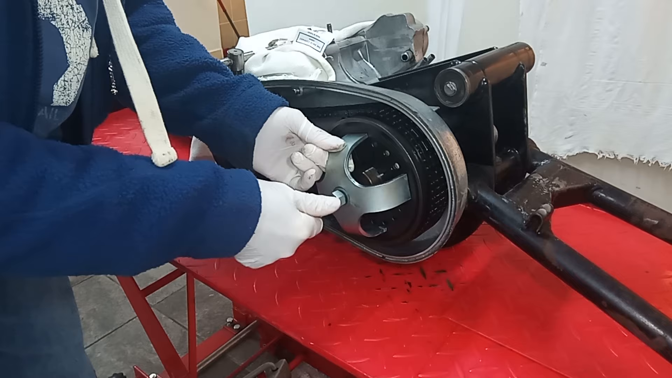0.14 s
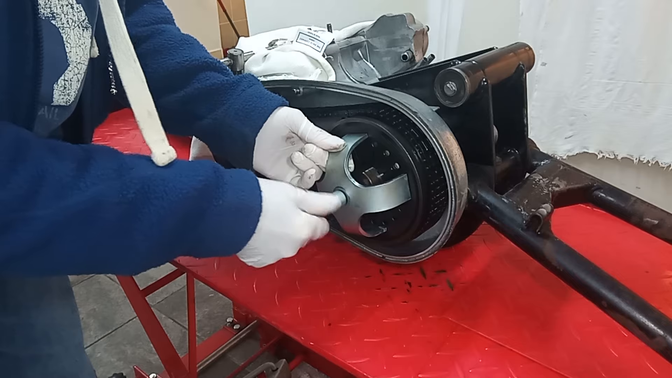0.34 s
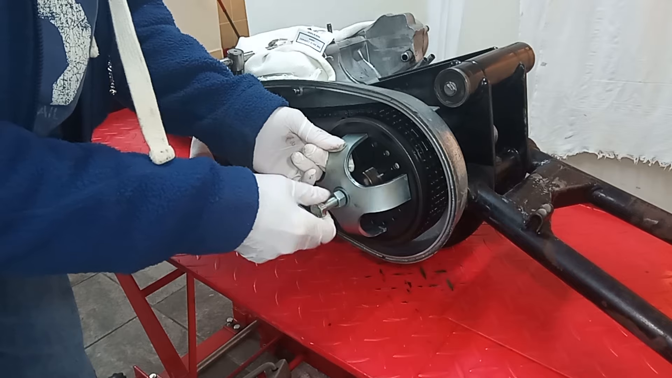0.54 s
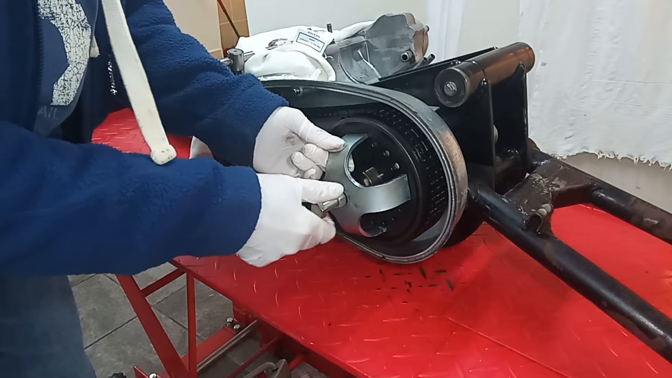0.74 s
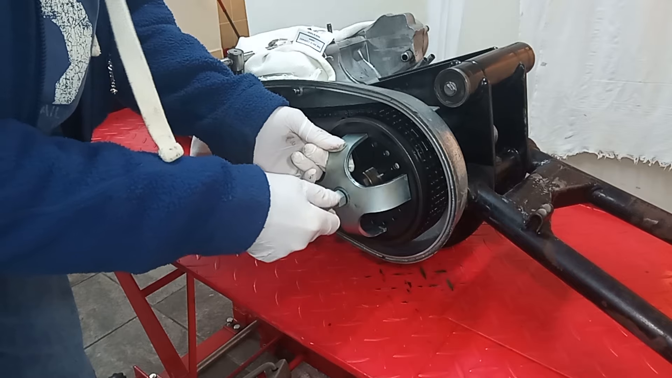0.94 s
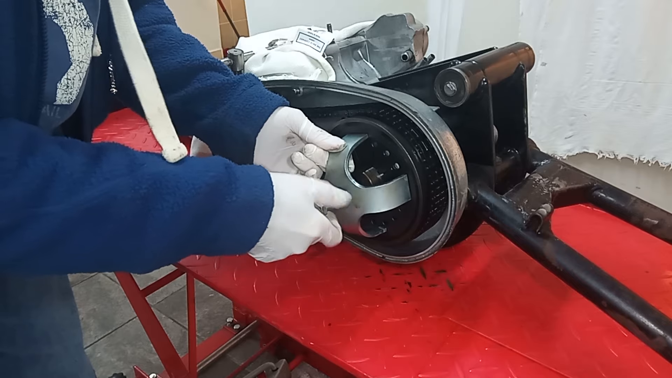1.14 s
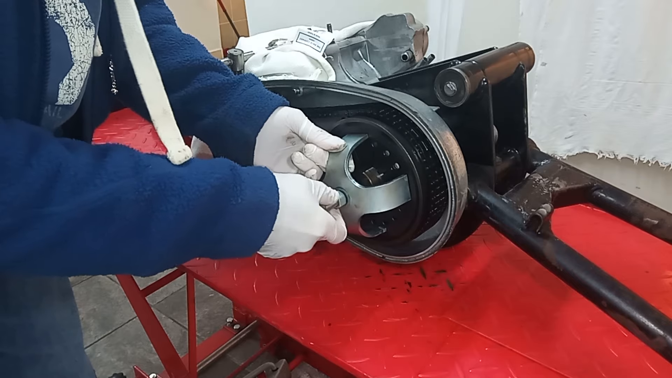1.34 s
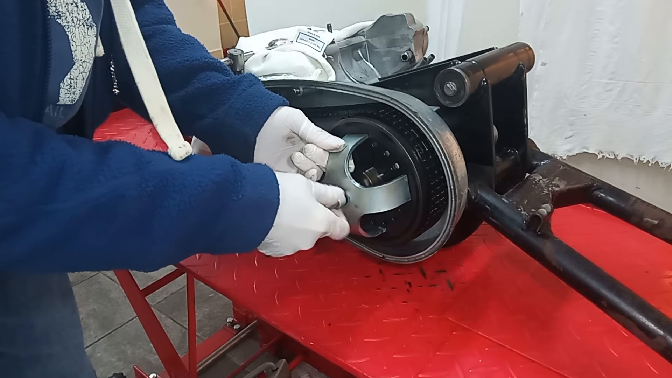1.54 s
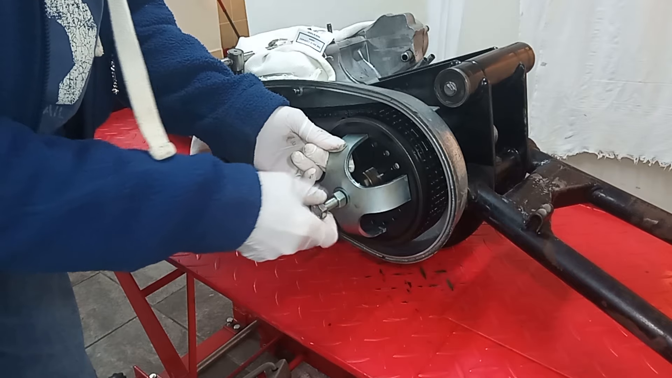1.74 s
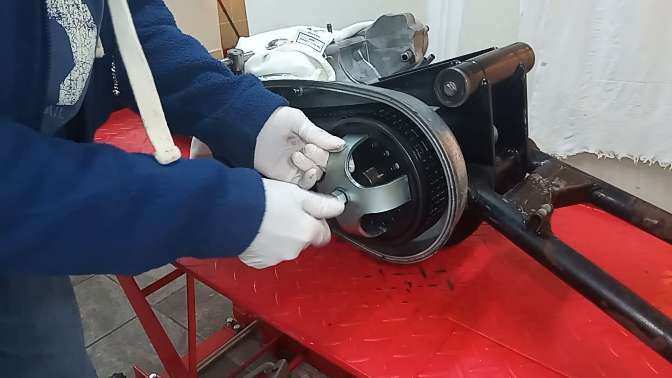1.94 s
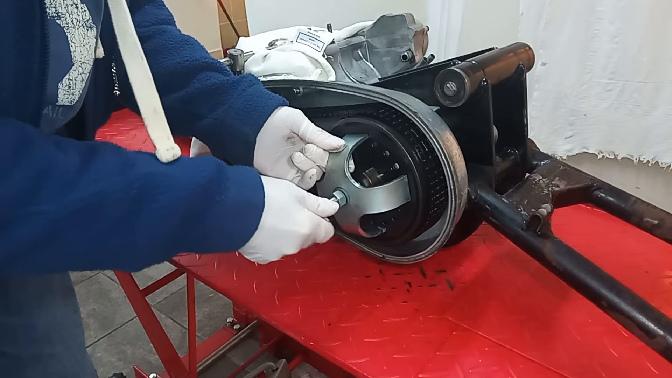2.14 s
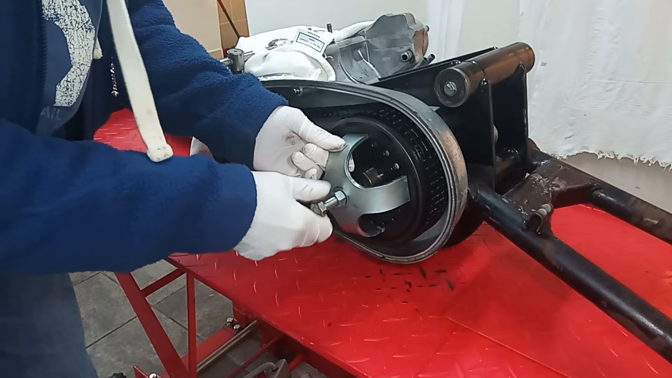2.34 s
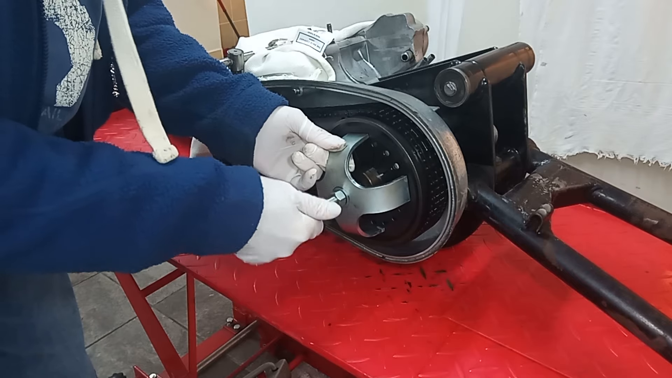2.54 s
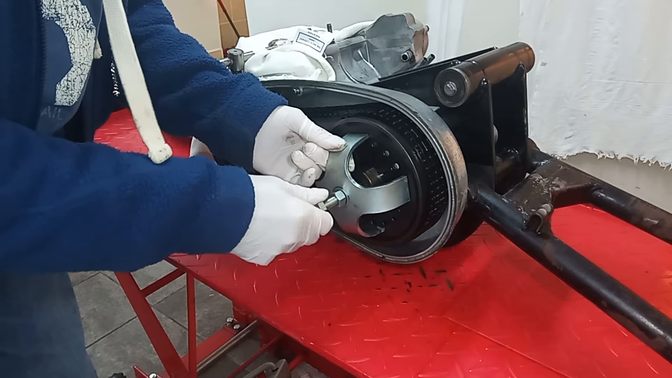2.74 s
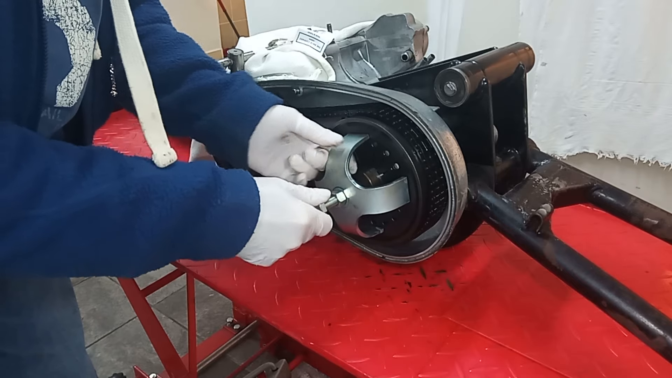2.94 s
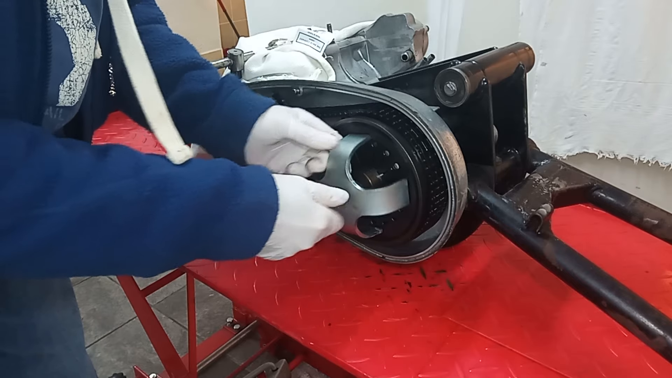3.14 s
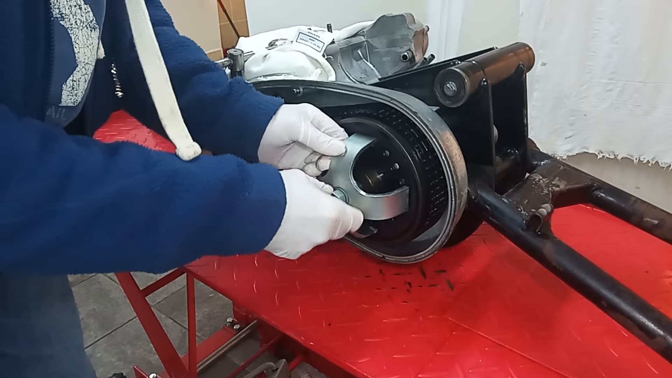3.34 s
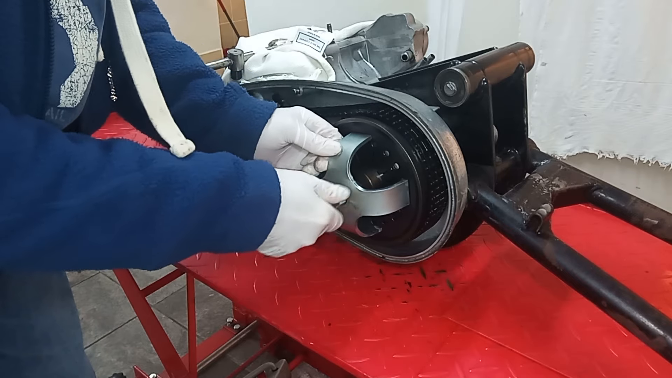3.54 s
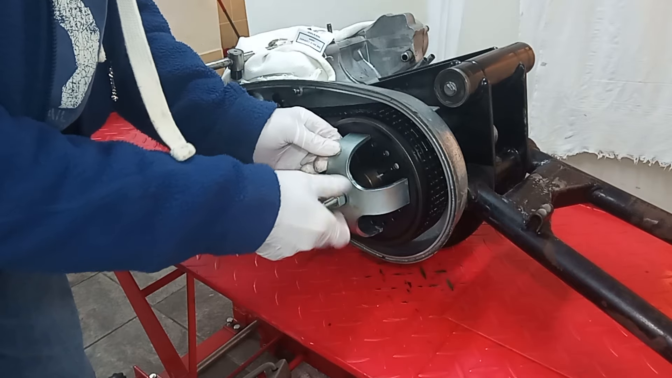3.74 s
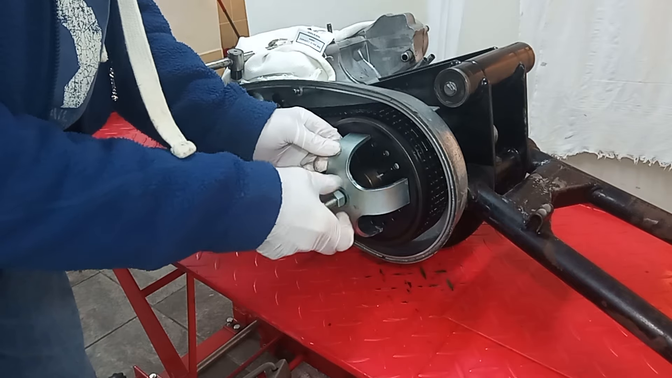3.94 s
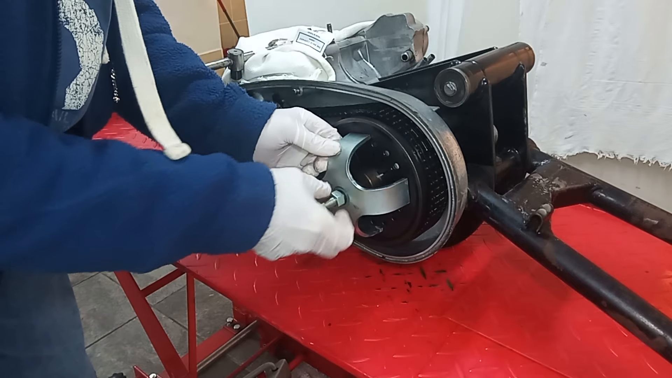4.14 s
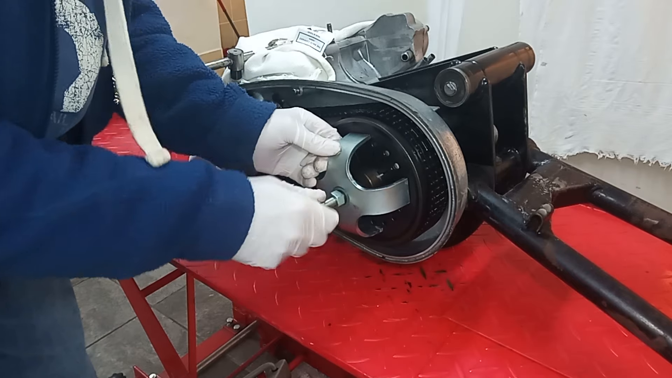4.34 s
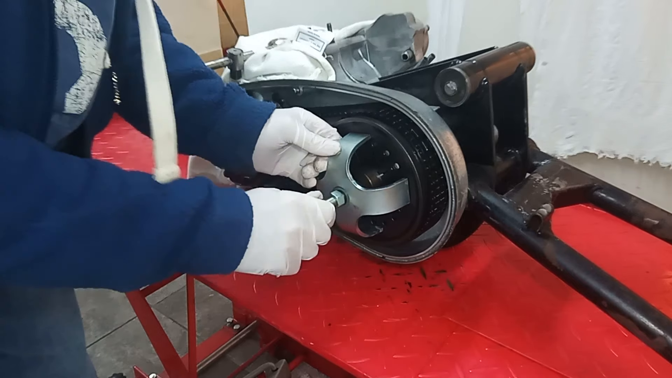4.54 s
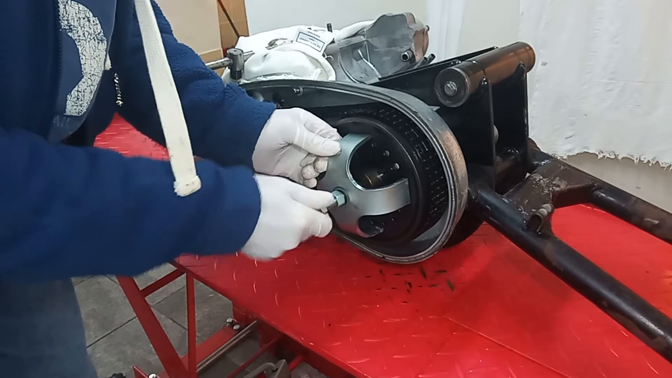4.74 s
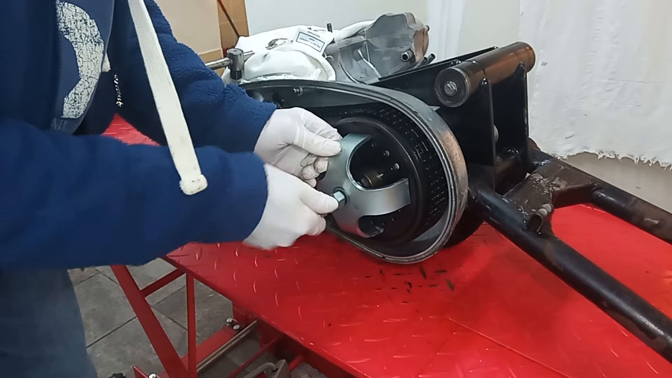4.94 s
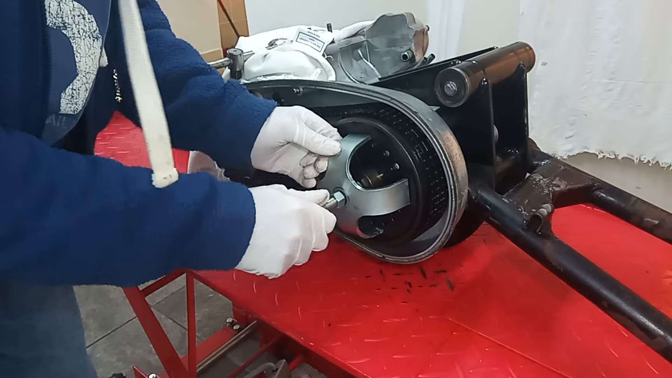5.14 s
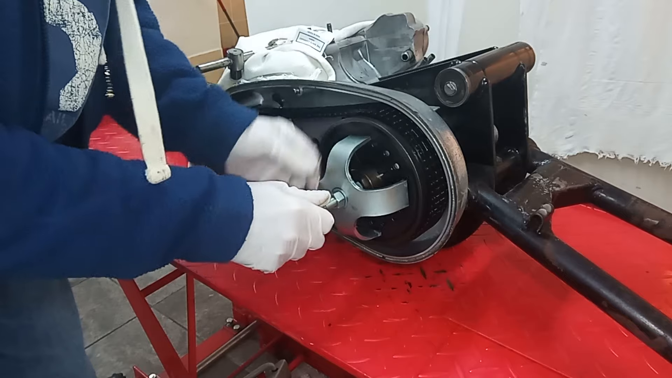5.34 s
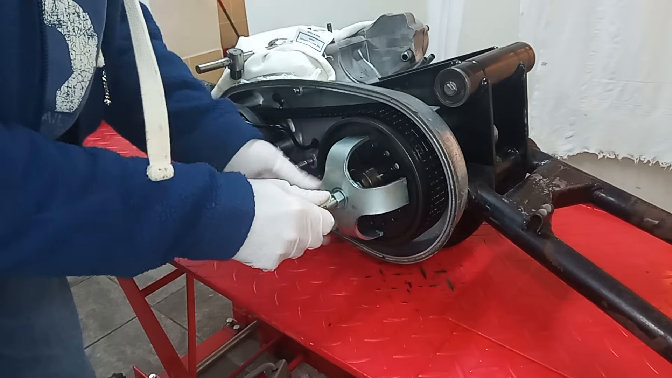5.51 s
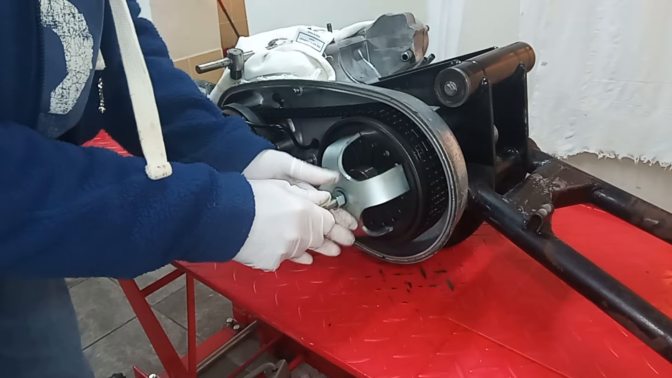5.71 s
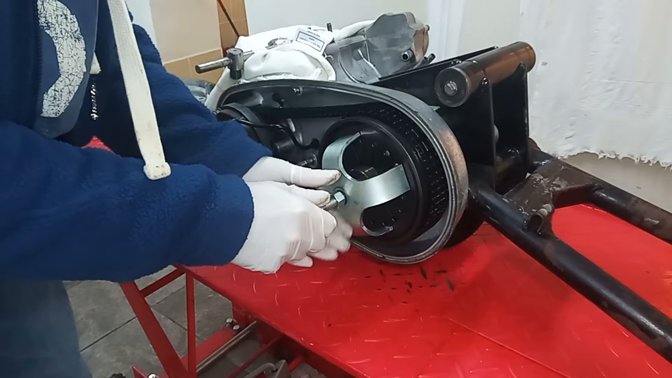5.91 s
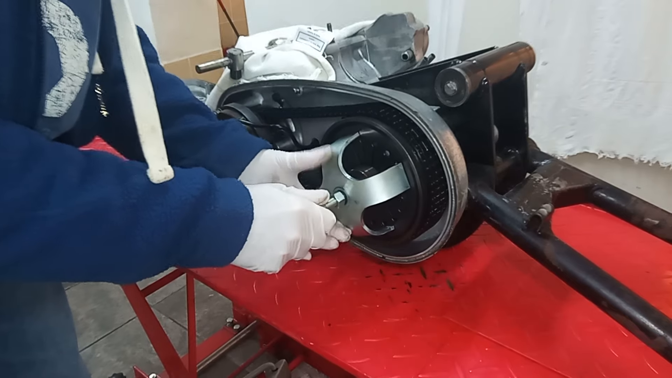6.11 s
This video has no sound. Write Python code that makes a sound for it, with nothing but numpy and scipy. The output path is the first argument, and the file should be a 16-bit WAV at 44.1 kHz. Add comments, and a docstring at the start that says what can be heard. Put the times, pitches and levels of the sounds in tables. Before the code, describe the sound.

Small steel parts click, scrape and clink as gloved hands screw a puller onto a clutch, ending in a louder ringing clatter.

```python
"""Fitting a clutch puller

Gloved hands fit a steel puller cup to a clutch on a sheet-steel lift in a small, quiet workshop.
Sleeves rustle, the screw clicks and scrapes in its thread, the cup clinks and rings, the lift thumps.
A phone microphone with a strong treble peak and a noise suppressor listens from close by."""
import sys
import numpy as np
from scipy import signal
from scipy.io import wavfile
from scipy.ndimage import uniform_filter1d

SR = 44100
rng = np.random.default_rng(int(sys.argv[2]) if len(sys.argv) > 2 else 0)


def wav_record(signal):
    """Record a signal, one row per channel, as 16-bit PCM in the file named by sys.argv[1]."""
    frames = np.transpose(np.atleast_2d(signal))
    bounded = np.clip(frames, -1, 1)
    # unit amplitude maps onto the largest positive 16-bit level
    quanta = np.round(bounded * 32767).astype(np.int16)
    wavfile.write(sys.argv[1], SR, quanta)


N = 276507


def amp(db):
    return 10 ** (np.asarray(db) / 20)


def unit_rms(x):
    return x / np.sqrt(np.mean(x ** 2) + 1e-20)


def curve_at(points, hz):
    f, value = np.transpose(points)
    return np.interp(np.log(hz + 1), np.log(f + 1), value)


def add(mix, start_s, sound):
    part = mix[round(start_s * SR):][:len(sound)]
    part += sound[:len(part)]


def equalise(x, points):
    """Minimum-phase EQ through points of f/Hz, gain/dB."""
    log_gain = np.log(amp(curve_at(points, abs(np.fft.fftfreq(4096, 1 / SR)))))
    taps = np.fft.ifft(np.exp(np.conj(signal.hilbert(log_gain)))).real[:2048]
    return signal.oaconvolve(x, taps)[:len(x)]


def resonate(x, modes):
    """Parallel resonators: f/Hz, width/Hz, gain/dB."""
    return sum(amp(db) * signal.lfilter(*signal.iirpeak(hz, hz / width, SR), x)
               for hz, width, db in modes)


def grit(count, depth_db, hold):
    """Noise whose level jumps every `hold` samples, as slips and bounces differ in size."""
    jumps = amp(depth_db * rng.standard_normal(count // hold + 1).clip(-2, 2)).repeat(hold)[:count]
    return unit_rms(rng.standard_normal(count) * jumps)


def room_tone():
    """A steady, bass-heavy bed of noise."""
    # spectrum of the workshop air: f/Hz, gain/dB
    spectrum = [(25, -2), (80, 15.5), (160, 16.5), (400, 11), (1000, 2), (3000, 0), (16000, 6)]
    return unit_rms(equalise(rng.standard_normal(N), spectrum))


def workshop_reverb(x):
    """Sparse echoes of random sign, the treble dying first."""
    # decay of the room: f/Hz, t60/s
    decay = [(150, 0.7), (1000, 0.48), (4000, 0.26), (12000, 0.2)]
    echoes = np.zeros(SR)
    slots = np.arange(300, SR - 20, 20)
    echoes[slots + rng.integers(0, 20, len(slots))] = rng.choice([-1., 1.], len(slots))
    hz, t, bands = signal.stft(echoes, SR, nperseg=256)
    tail = signal.istft(bands * amp(-60 * t / curve_at(decay, hz)[:, None]), SR, nperseg=256)[1]
    return signal.fftconvolve(x, tail / np.linalg.norm(tail))[:N]


def friction(count, dull_db, sharp_db, grind):
    """Fine slips: plain hiss from cloth and rubber, or pitched by the screw thread."""
    # resonances of the thread: f/Hz, width/Hz, gain/dB
    thread_modes = [(2107, 20, -2), (5120, 98, 6), (6010, 110, 7.5)]
    slips = grit(count, depth_db=2.68, hold=128)
    thread = resonate(slips, thread_modes)
    bright = equalise(slips, [(2500, -35), (5000, -1.5), (7500, 7), (10000, sharp_db)])
    dull = equalise(slips, [(200, -1.5), (800, -0.5), (3000, -3), (5000, -51.5)])
    return 1.12 * (1 - grind) * bright + 5.65 * grind * thread + amp(dull_db) * dull


def cloth_rustle():
    """Sleeves and gloves rub softly all the time."""
    # movement of the cloth: t/s, level/dB, dull part/dB
    moves = [(0, -51, 0.5), (.2, -61, 5), (.9, -67, 18), (1.3, -54.5, -0.5), (1.7, -51, -6),
             (2.1, -56.5, -14), (2.9, -61.5, -1), (3.4, -51, 4), (3.75, -61.5, -14), (4.3, -56.5, 0.5),
             (5.3, -57, 1.5), (6.27, -79, -7)]
    times, level_db, dull_db = np.transpose(moves)
    t = np.arange(N) / SR
    hiss = friction(N, np.interp(t, times, dull_db), sharp_db=0, grind=0)
    return amp(np.interp(t, times, level_db)) * hiss


def lift_thump(boom_hz, t60_s=0.37, attack_s=0.0063):
    """The heavy sheet takes a moment to swing up and booms briefly, each time a little differently."""
    # modes of the sheet: f/Hz, level/dB
    sheet_modes = [(108, -0.5), (151, 6), (176, 4.5), (205, -2), (255, -11.5), (295, -1), (340, 0.5),
                   (385, -8.5), (440, 0.5)]
    t = np.arange(SR // 2) / SR
    hz, db = np.transpose(sheet_modes)[:, :, None]
    detune, phase = rng.random((2, *hz.shape))
    db = db - 12 * abs(np.log2(hz / boom_hz))
    modes = amp(db) * np.sin(2 * np.pi * (hz * (1 + (detune - .5) / 45) * t + phase))
    return modes.sum(0) * (1 - np.exp(-t / attack_s)) * amp(-60 * t / t60_s)


def scrape_or_tail(dull_db, grind, length_s, lead_s, rise_share=0.49):
    """A swell of rough hiss peaking at lead_s: a short scrape or a clink's tail; grind dulls its top."""
    t = np.arange(SR // 3) / SR - lead_s
    width_s = length_s * np.where(t < 0, rise_share, 1 - rise_share)
    swell = np.exp(-(t / width_s) ** 2)
    return swell * friction(len(t), dull_db, sharp_db=7 - 36.5 * grind, grind=grind)


def cup_ring(t, blow_db, ring_hz, attack_s=0.00072):
    """The struck cup rings in the glove; harder blows ring longer and wake modes far from ring_hz."""
    # modes of the steel cup: f/Hz, level/dB, t60/s
    cup_modes = [(640.7, -3.5, 0.13), (809, -17.5, 0.34), (877, -8, 0.33), (1169, -11.5, 0.45),
                 (1556, -11.5, 0.089), (2135, -6, 0.054), (2389, -13, 0.35), (2374, -18.5, 0.32),
                 (2718, -16.5, 0.26), (3140, -13.5, 0.1), (3670, -10, 0.069), (4100, 0, 0.13),
                 (5285, -8.5, 0.32), (6190, -60, 0.11), (5710, -26, .15), (6400, -19, 0.16),
                 (6760, -15, 0.066), (6900, -15, 0.35), (6800, 0.5, 0.17), (8454, -6, 0.56),
                 (9540, -15, 0.12), (10850, -10, 0.22), (12360, -6.5, 0.1)]
    hz, mode_db, t60 = np.transpose(cup_modes)[:, :, None]
    reach_octaves = 0.077 + 1.13 * amp(0.56 * blow_db)
    spot_db = -6 * abs(np.log2(hz / ring_hz)) / reach_octaves + 2.27 * rng.standard_normal(hz.shape)
    gripped_t60 = t60 * 1.086 * 2 ** (blow_db / 26.5)
    # loose contact makes each mode waver
    waver = unit_rms(uniform_filter1d(rng.standard_normal((len(hz), len(t) // 128 + 1)), size=3))
    chatter_db = 2.94 * uniform_filter1d(waver.repeat(128, 1), size=128)[:, :len(t)]
    envelopes = amp(mode_db + spot_db + chatter_db - 60 * t / gripped_t60)
    modes = envelopes * np.sin(2 * np.pi * (hz * t + rng.random(hz.shape)))
    return modes.sum(0) * np.minimum(t / attack_s, 1) * (1 - t / t[-1])


def steel_clink(db, body_db, sharp_db, rattle_s, ring_db, ring_hz, touch_s=0.003):
    """A crack and a short rattle sound in the hollow clutch; the first touch sets the cup ringing."""
    # air and walls of the clutch: f/Hz, width/Hz, gain/dB
    clutch_modes = [(740, 440, -12), (2315, 57, -3), (2530, 380, -2), (4220, 290, -0.5), (6073, 292, -1)]
    t = np.arange(SR // 2) / SR
    touch = rng.standard_normal(len(t)) * np.exp(-t / touch_s)
    rattle = 0.83 * grit(len(t), depth_db=5.5, hold=64) * np.exp(-t / rattle_s)
    low_db = -9 + 0.42 * body_db
    colour = [(250, low_db - 6.5), (700, low_db + 9), (1300, low_db + 13), (2300, body_db + 8),
              (3400, body_db / 2 + 9.5), (4800, -1.5), (6000, 2.5), (7500, 2), (10000, sharp_db + 18)]
    crack = equalise(touch + rattle, colour)
    hollow = resonate(crack, clutch_modes + [(ring_hz, 350, 3)])  # plus the struck spot's own note
    ring = amp(ring_db) * cup_ring(t, db, ring_hz)
    return amp(db) * (0.5 * crack + 0.42 * hollow + 1.456 * ring)


def scene():
    """Close handling sounds over workshop reverb and room tone."""
    # steel on steel: t/s, level/dB, hollow body/dB, sharp edge/dB, rattle/s, ring/dB, ring centre/Hz
    clinks = [(0.0608, -21, -3, -67, 0.0034, -7.5, 2300), (0.068, -38.5, 16, -48, 0.0057, 10.5, 2340),
              (0.1092, -25.5, -15, -51, 0.016, -5.5, 1960), (0.2754, -36.5, -23, -62, 0.01, -20, 3970),
              (0.347, -31.5, -9, -37, 0.016, -21, 2400), (0.3645, -29, -7, -45, 0.025, -1.5, 2000),
              (0.41, -38, -24, -37, .008, -32, 2100), (0.5839, -28, 10, -56, 0.0057, 1, 2270),
              (0.646, -35.5, -11.5, -37, 0.036, -27, 2400), (.9835, -40, 4.5, -70, 0.0094, 8, 2160),
              (1.699, -39.5, -3, -15, 0.008, -12, 4080), (1.876, -38.5, -15, -36, .006, 10.5, 2390),
              (1.9078, -22.5, -4, -26, 0.011, -5, 1514), (2.148, -27.5, -22, -37, 0.025, 4.5, 2100),
              (2.157, -39.5, -5, -40, 0.0091, 6.5, 820), (2.185, -21.5, -4.5, -26.5, 0.0072, -39, 4160),
              (2.228, -61, -17, -28, .005, -14, 4100), (2.3135, -40, 5.5, -17, 0.014, -1.5, 4080),
              (2.34, -41, 5, -14, 0.0065, -1, 1190), (2.366, -34.5, -30, -45, 0.0035, -27, 6850),
              (2.4088, -22, -19, -55, 0.0077, -8.5, 2380), (2.412, -40, -10, -40, 0.0073, 8, 810),
              (2.493, -40.5, -9, -26, .005, -29, 2400), (2.599, -40, -25, -8.5, 0.015, -9.5, 6860),
              (3.018, -46, -36, -9, 0.0061, 15, 4080), (3.083, -34.5, -30, -5.5, 0.0058, -19, 6900),
              (3.2048, -19, -6.5, -28, 0.026, -32, 5230), (3.2735, -7.5, -13, -20.5, 0.015, -13.5, 1204),
              (3.45, -17.5, -9.5, -25, 0.024, -14.5, 2740), (3.6236, -22.5, -22, -56, .0055, -19.5, 5300),
              (3.9546, -28.5, -31, -26, 0.0079, -25, 5340), (4.035, -31, -47, -3, 0.014, -34, 10000),
              (4.1554, -26, -13, -6.5, 0.0092, -40, 6000), (5.162, -38.5, -45, -11, 0.0057, -25, 6740),
              (5.28, -57.5, -18, -25, .005, 3, 4230), (5.3387, -26, -8.5, -18, 0.0034, -6, 3960),
              (5.34, -24, -22, -8, 0.022, -4.5, 7000), (5.436, -31, -24, -16, 0.025, -12, 3940),
              (5.5958, -23, -4, -30, 0.021, 1, 2450), (5.6078, -6.5, -7.5, -26, .013, -3.5, 3430),
              (5.663, -14, -6, -17.5, 0.024, -3.5, 820), (5.6754, -12, -5.5, -32, 0.031, -0.5, 2500),
              (5.7412, -7, -5.5, -29, 0.015, -11.5, 3330), (5.7743, -0.5, -8.5, -15, 0.025, -11.5, 7400),
              (5.7891, -3.5, -4.5, -44, 0.0091, -10, 2440), (5.8144, -11, -9.5, -36, 0.08, -9.5, 4480),
              (6.082, -46, -4, -33, .012, 10, 4030), (6.1013, -25.5, -7, -35, 0.021, -8.5, 1170),
              (6.193, -36, -10, -30, 0.019, 2, 2430)]
    # short scrapes and the rough, hissing tails of clinks:
    # peak t/s, level/dB, dull part/dB, grinding share/0-1, length/s
    scrapes_and_tails = [(1.102, -49.5, -24, 0, 0.057), (1.634, -46.5, -7, 0.38, 0.096),
                         (1.886, -43, 1.5, 0.34, 0.068), (2.131, -44.5, -12, 0.26, 0.099),
                         (2.669, -44, -11, 0.09, 0.04), (2.72, -50, -23, 0, 0.02),
                         (2.962, -53, -9, 0, 0.057), (3.061, -44, -10, 0, 0.029),
                         (3.203, -40.5, -13, .73, 0.03), (3.328, -32, 4, 0.24, 0.086),
                         (3.503, -45, 12, 0.3, 0.04), (3.653, -39, -5, 1, 0.027),
                         (3.688, -34.5, -42, 0.37, 0.048), (3.808, -37.5, -28, 0.16, 0.038),
                         (3.851, -55.5, 8.5, 0.94, 0.032), (3.924, -37.5, -33, 0.56, 0.039),
                         (4.156, -35.5, -17, 0.39, 0.034), (4.49, -52, -19, 0, 0.035),
                         (4.8, -49.5, -30, 0.24, .05), (4.895, -53.5, 3, .03, 0.08),
                         (5.046, -51, -19, 0, 0.045), (5.098, -43, -30, 0.19, 0.036),
                         (5.251, -52, 1, 0, 0.02), (5.37, -41, 8, 0.24, 0.064),
                         (5.445, -44.5, 7.5, 0.17, .12), (5.59, -40.5, -3, 0.23, 0.054),
                         (5.93, -30, 0, 0.38, 0.14), (5.972, -27.5, -3.5, 0.19, 0.073),
                         (6.111, -38, 3.5, 0.18, 0.052), (6.203, -48, 10.5, 0.05, 0.066),
                         (6.256, -33.5, -7, 0.28, 0.045)]
    # the lift shakes: t/s, level/dB, boom centre/Hz
    thumps = [(1.927, -44, 135), (2.19, -47.5, 107), (2.326, -50.5, 188), (2.43, -47, 138),
              (3.207, -42, 310), (3.29, -35, 214), (3.471, -32.5, 228), (3.575, -48.5, 320),
              (5.358, -37.5, 410), (5.37, -45.5, 109), (5.6, -30.5, 195), (5.668, -28, 376),
              (5.8, -24.5, 239), (6.098, -46.5, 170), (6.211, -46.5, 300)]
    lead_s = 0.1
    near = cloth_rustle()
    for start_s, *blow in clinks:
        add(near, start_s, steel_clink(*blow))
    for peak_s, db, *shape in scrapes_and_tails:
        add(near, peak_s - lead_s, amp(db) * scrape_or_tail(*shape, lead_s))
    for start_s, db, boom_hz in thumps:
        add(near, start_s, amp(db) * lift_thump(boom_hz))
    air = amp(-54) * room_tone()
    return (near + amp(-10.5) * workshop_reverb(near) + air)[None]


def noise_suppressor(x, open_db=-51, under_db=12, memory_s=0.23, slope=0.8, floor_db=-11):
    """Turns quiet passages down; a loud knock lifts the threshold, so echo tails end early."""
    power = abs(uniform_filter1d(x ** 2, size=800)) + 1e-20
    pole = np.exp(-1 / (memory_s * SR))
    recent_power = abs(signal.lfilter([1 - pole], [1, -pole], power))
    threshold = amp(open_db) ** 2 + recent_power / amp(under_db) ** 2
    return x * amp(floor_db / (1 + (power / threshold) ** slope))


def record(dry):
    """Microphone colour, noise suppressor, soft overload on the loudest knocks, band limit."""
    # microphone in its port: f/Hz, gain/dB
    port = [(1000, -5.5), (3000, -5.5), (5000, -4), (6900, 2), (7500, -10), (8500, -20.5), (10400, -5),
            (11800, -17), (13200, -21), (15000, -16), (15800, -8.5), (16200, -30)]
    ceiling, cutoff_hz = 0.95, 16750
    heard = noise_suppressor(equalise(dry[0], port))
    heard = ceiling * np.tanh(heard / ceiling)
    lowpass = signal.firwin(511, cutoff_hz, window=("kaiser", 9), fs=SR)
    return signal.oaconvolve(heard, lowpass, "same")[None]


dry = scene()
out = record(dry)
wav_record(out)
```